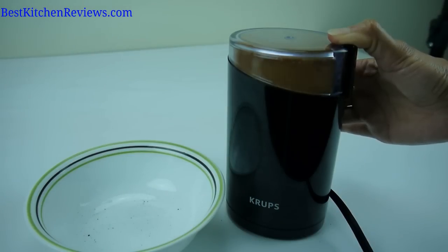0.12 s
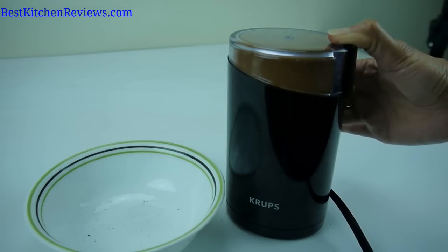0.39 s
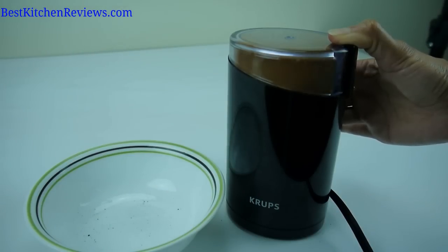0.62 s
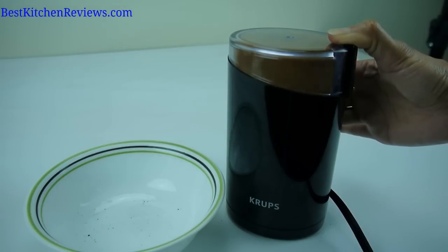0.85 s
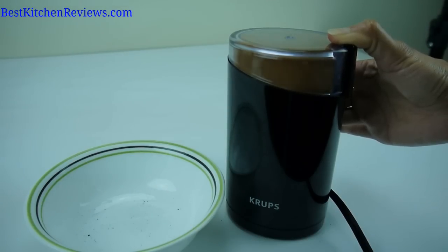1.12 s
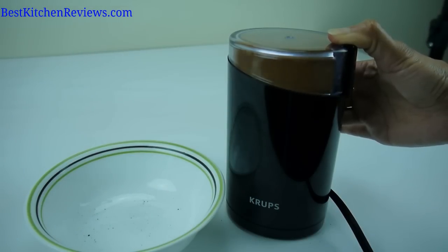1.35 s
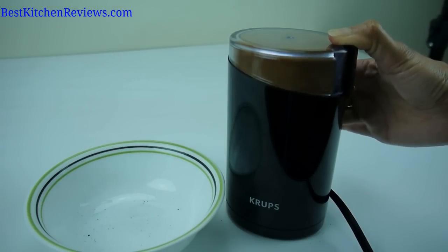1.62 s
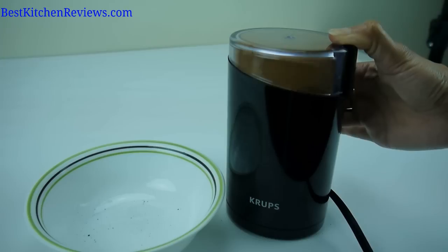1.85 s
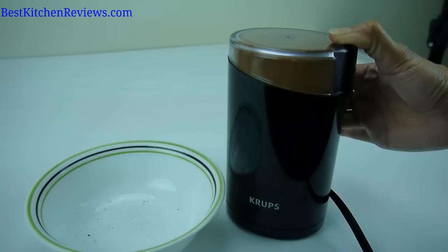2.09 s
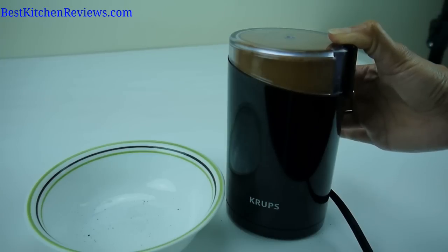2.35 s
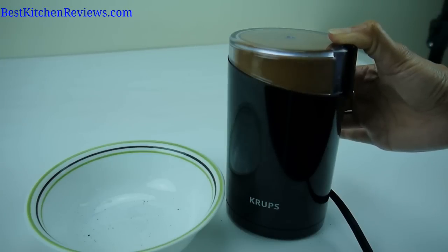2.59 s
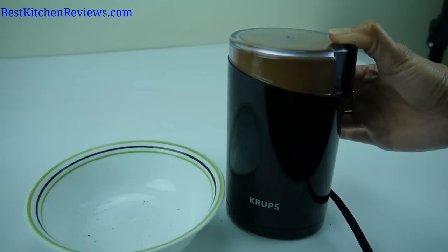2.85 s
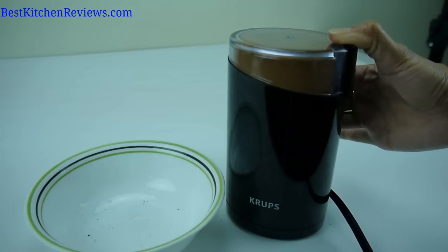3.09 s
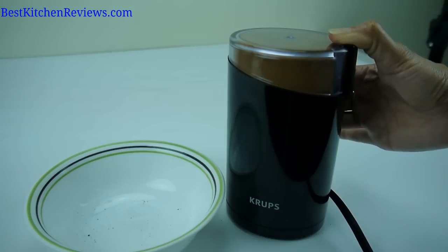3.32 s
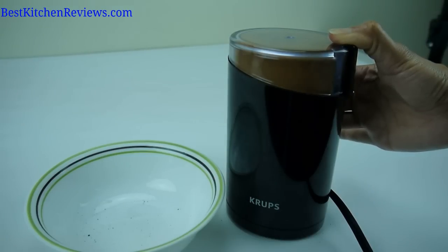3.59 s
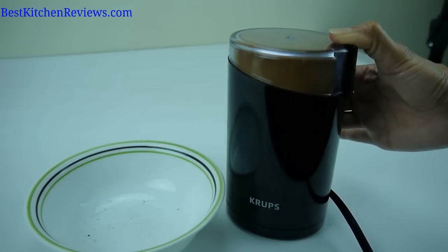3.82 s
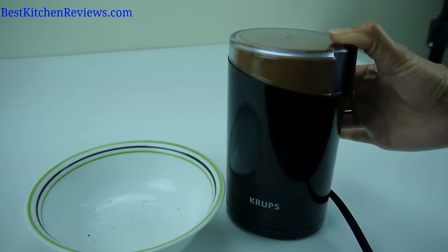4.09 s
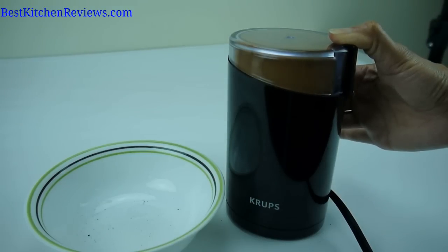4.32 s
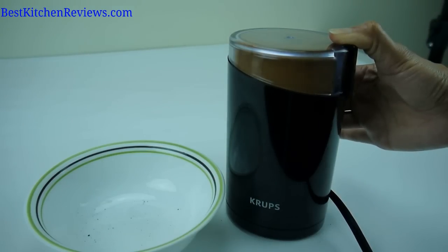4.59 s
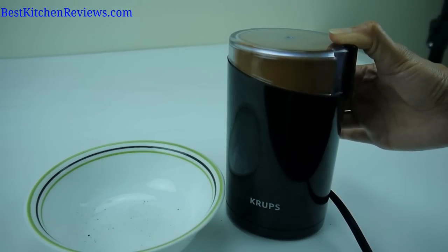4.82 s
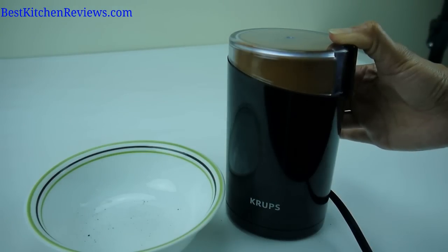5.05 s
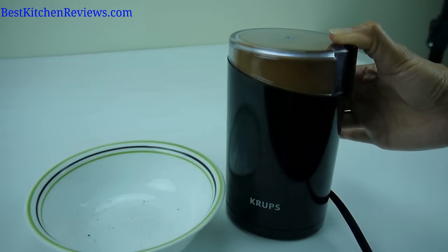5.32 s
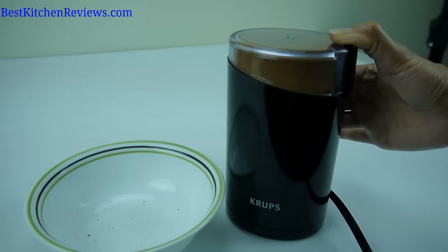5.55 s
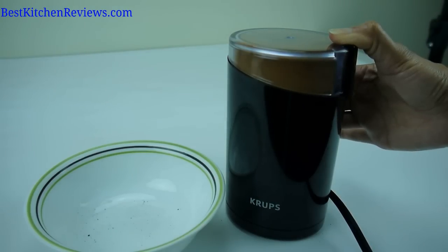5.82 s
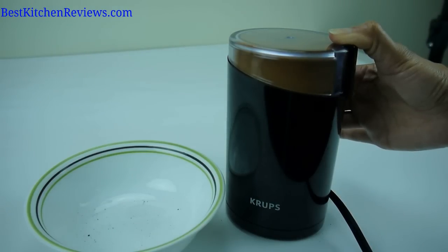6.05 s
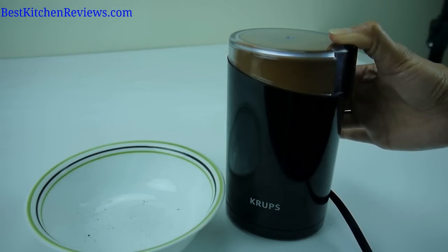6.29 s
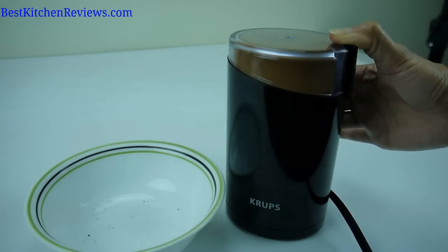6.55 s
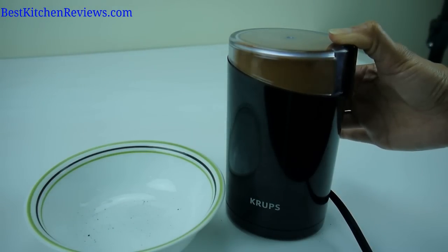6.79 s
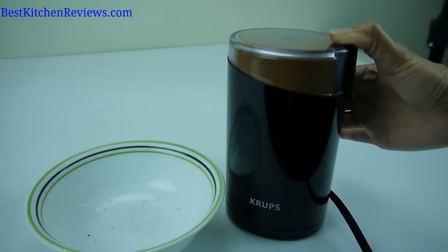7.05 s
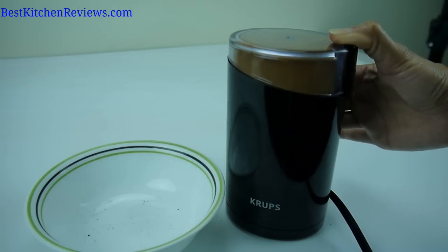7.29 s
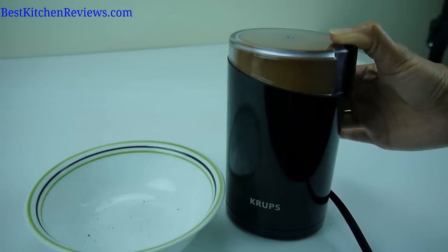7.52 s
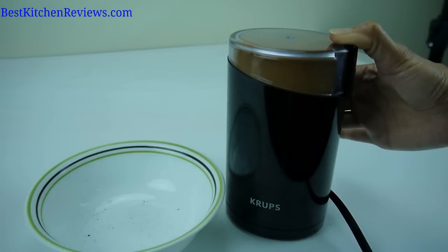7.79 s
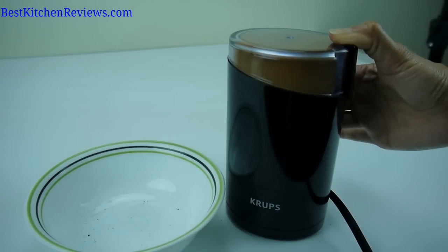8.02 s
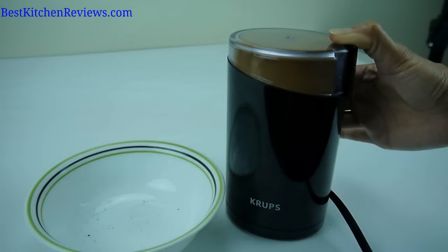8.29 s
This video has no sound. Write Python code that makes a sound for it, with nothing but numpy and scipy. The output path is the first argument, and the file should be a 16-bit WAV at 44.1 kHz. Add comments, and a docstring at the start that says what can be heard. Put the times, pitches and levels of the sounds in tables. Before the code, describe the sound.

From 0 s an electric blade grinder is already at full speed, loud and close in a small hard room. A piercing whine near 3.5 kHz swells within the first 0.3 s, wavering and dipping when heavy pieces hit, creeping slightly higher over time. Beneath are a faint low hum, an unsteady mid-pitched shaft tone and flickering low patches. Dense crumbs make a bright, gritty hiss throughout. Hard sticks strike the cup and plastic cover roughly twenty irregular main times a second, with lighter taps between: dry cracks, brief clatter, occasional dull thumps, the hardest overloading. From about 3 to 5.5 s the motor tones become steadier; the whine weakens near 5.7 s and returns around 6.3 s. Light cracks and hiss soften slightly, yet strong clatter bursts continue around 7 to 7.6 s. Short wall reflections surround everything. It ends near 8.4 s still running.

```python
"""In a small hard room, an electric blade grinder runs at full speed on a table, close to a stereo microphone.
The motor is a set of wandering sines: a whine on the eighth shaft order, the shaft tone, mains hum and side tones.
Crumbs (dense random grains) and struck sticks (sharp decaying bursts) ring one cup and its plastic cover.
Narrow low patches, sines of wandering phase, blink on and off; hard strikes add noise thumps;
feedback delays add the walls, and the hardest bursts overload the recorder."""
import sys
import numpy as np
from scipy import signal
from scipy.fft import rfft, irfft
from scipy.io import wavfile
from scipy.ndimage import uniform_filter1d

SR = 44100
rng = np.random.default_rng(int(sys.argv[2]) if len(sys.argv) > 2 else 0)


def boost(x):
    """Linear amplitude factor 10**(x/20) for a level x in decibels (scalar or array-like)."""
    u = np.asarray(x, float) / 20
    return 10 ** u


def to_wav(s):
    """Save 16-bit WAV."""
    ch = np.atleast_2d(s).T  # columns
    pcm = np.round(np.clip(ch, -1, 1) * 32767)  # PCM
    wavfile.write(sys.argv[1], SR, pcm.astype(np.int16))


N = 370440

# hard blows of the blade on a stick, levels relative:
# start_s [s], crack_db [dB], clatter_db [dB], knock_db [dB, dull knock above the rattle]
BLOWS = [(0.004, 5.5, -5, -17), (0.073, 0, -20.0, -13.0), (0.0827, -11.5, -2, -16),
         (0.1147, -20.0, -4, -19.0), (0.182, -14, -4, -11.0), (0.214, -16, 4.5, -23),
         (0.237, -13, -22, -15.0), (0.2677, -20.0, 4.5, -7), (0.3844, 3, -13, -10.0),
         (0.431, -24, -4, -16.0), (0.4869, -5.5, -18, -21.0), (0.5108, -4, -13.0, -11.0),
         (0.5358, -20.0, -2, -17), (0.561, -20.0, 7.5, 1.5), (0.6577, -16, 4.5, -15),
         (0.7046, -7, 0, -12.5), (0.713, 0.0, -20.0, -11.0), (0.7273, -22, -6, -16.0),
         (0.749, -18, -5, -14), (0.758, -10.5, -4.5, -10.0), (0.8171, -20.0, -3.5, -18),
         (0.854, 7, -20.5, -13), (0.878, -9.0, 5, -12), (0.89, -20.0, -4, -15), (0.918, 2, -4, -8),
         (0.939, 1, -20.0, -8), (1.0267, -5.0, 0.5, -9), (1.0487, 0.5, -12.5, -15), (1.0544, 10, 2, -13.5),
         (1.097, -18, -1, -4), (1.1504, -5, -13.5, -10.0), (1.1796, 2.5, -20.0, -14),
         (1.2342, -17, -5.5, -24.0), (1.283, -3, 2, -16.5), (1.291, -20.0, 3.5, -12), (1.3768, -8, -1, -17),
         (1.404, 7, 2, -7), (1.4407, -16, -1.5, -16), (1.5, -22, 11, -25), (1.5915, -1.0, 0.5, -16),
         (1.6362, -14, -7, -14.0), (1.6476, 2, -16, -16), (1.6824, -8, -3.5, -9), (1.7679, -10, -3.5, -19),
         (1.776, 7, -16, -24), (1.7856, -10.5, -5, -18), (1.7959, -9.5, -28, -14.0),
         (1.832, -7.5, -4, -25.5), (1.888, -4, 0, -2.5), (1.9156, -4, -18, -15.0),
         (1.9727, -20.0, -2, -15.5), (1.984, -9.5, 3.5, -23.5), (2.0124, -23, 1.5, -25),
         (2.062, -5, -20.0, -13), (2.1012, -22, -1, -18), (2.1301, -20.0, 0.5, -13.0),
         (2.1501, 4, -11, -14.0), (2.168, -11, -6.5, -14), (2.186, -1, -17, -14.0),
         (2.2379, -5.5, -13, -10), (2.2668, -6, -3.5, -10), (2.3336, -0.5, -19, -17.5),
         (2.3791, 8, -2.5, -5.5), (2.413, -20.0, -5, -4), (2.4383, 2.5, -25, -13.0), (2.5065, 2.5, -8, -19),
         (2.5362, -17, 2.5, -5), (2.62, -16.5, 1.5, -14.5), (2.6833, 2, -3, -16.5), (2.719, -2, -23, -14),
         (2.7556, -17, -2.5, -4.5), (2.7666, -2.5, -13, -10.0), (2.7896, -13.5, -4, -15),
         (2.8247, -10, 3.5, -0.5), (2.869, 1, -13.0, -14), (2.897, -21.5, -3, -8.0),
         (2.977, -1, -10.5, -18.0), (3.0915, 0, 1.0, -20), (3.122, -0.5, -22, -8.5),
         (3.1294, -1.5, -10, -17), (3.2395, 6, -17, -16), (3.2475, -20.0, -4.5, -15.5),
         (3.2557, -20.0, -5, -16.5), (3.316, -11.5, -1.5, -9.5), (3.378, -21.5, -5, -16),
         (3.405, -1, -4, -17.5), (3.4231, -20.5, -5, -19), (3.4521, -20.0, -2.5, -15.0),
         (3.5205, -21.5, 2.5, -10), (3.5365, -21, 8, -3), (3.61, -5.0, 3.5, -10), (3.67, -6, -3.5, -17.5),
         (3.7234, -23, 0, -25.5), (3.822, -20.0, -3, -16), (3.928, 0, -2.5, -3), (3.9866, -9, 7, -11),
         (4.0344, 5, 0.5, -18), (4.0776, -22.5, -1.5, -18), (4.1575, -22, -3.5, -9.5),
         (4.2642, 0.5, -12.5, -7.5), (4.2832, -0.5, -13, -3), (4.3005, -1.0, 2.5, -6),
         (4.3135, 0, 1.5, -10), (4.338, 0, -8.5, -17), (4.4142, 2, -21, -11.0), (4.4734, -1, -15.5, -14.5),
         (4.4957, -20.0, -5, -19.5), (4.6294, -11, 5, -17), (4.683, -6, -3.5, -11.5),
         (4.8767, -3, 0.5, -18), (4.9347, -0.5, -15, -15.0), (4.9462, 2, -10, -15.5),
         (4.9576, -3.0, -19, -17.0), (5.0172, 0.5, -4, -3), (5.0286, -22.5, 4.5, -13.0),
         (5.086, -24, -3.5, -12), (5.153, -2, -10.5, -5), (5.1751, -2, -9, -16.5), (5.213, -22.5, -7, 1),
         (5.2459, -10.5, -5, -13.0), (5.275, 0, -9.5, -11.5), (5.3367, -2.0, -32, -13.0),
         (5.3816, -9.5, -13, -18.5), (5.4195, -3, -5.5, -2.5), (5.4385, -3, -9, -14),
         (5.487, -26, -5.5, -5), (5.5755, -16.5, -2.5, -0.5), (5.627, -28, -3, -13.5),
         (5.654, 0, 0.5, -18.5), (5.755, -20.0, -4, -15.5), (5.768, -24, -5, -13),
         (5.9613, -27, -0.5, -17.5), (6.09, -6.0, -9, -7.5), (6.139, 1.5, -15.0, -8.5),
         (6.1608, -15.0, -8, -6), (6.1788, -20.0, -2, -12), (6.3733, -24, -3, -8.0),
         (6.3943, 4, -24.5, -15), (6.441, -21.5, -6, -23.5), (6.5499, -3, 1, -0.5), (6.5616, -17.5, 5, -2),
         (6.6233, -19, -4, -3), (6.707, 1.5, -21, -9), (6.7654, -14.0, -13, -13.5),
         (6.8463, -20.5, -10, -7.5), (6.8916, 3, -6.5, -16), (6.9301, -18, -5.5, -14),
         (6.94, 4.5, -9.5, -15), (6.966, 2, 5, -13.0), (7.029, -14.5, 6.5, -3.5), (7.0528, 2, -19, -6),
         (7.0763, -19.5, -5, 1.5), (7.229, -16.5, -6, -13.0), (7.277, -20.0, 1.5, -10.5),
         (7.3581, -19.5, 9, -7), (7.414, -17, -4.5, -12.5), (7.4918, -12.5, -7, -10.5),
         (7.5122, -21, 8.5, -6.5), (7.557, -20.0, 6.5, -5.5), (7.6194, -19, -3, -15.5),
         (7.835, -12, -9, -1), (7.8879, -11.5, -8.5, -20), (7.9637, -20.5, -4.5, -7),
         (8.0452, -5.5, -4.5, -10.5), (8.144, -13, -1.0, -5), (8.1812, -4.5, -11.5, -10.5),
         (8.192, -0.5, -26, -12.5), (8.2844, -10.0, -6, -19), (8.3498, -20.5, -2, -18),
         (8.3717, 1, -7, -21)]
# how far the low sounds sway between the sides: pitch_hz [Hz], side_minus_mid_db [dB]
SIDE_SWAY = [(60, -15.5), (380, -10), (2380, 0), (15000, -14)]
SIDES = np.array([[1], [-1]])   # left, right


def rms_one(x):
    """Scale to unit rms."""
    return x / np.sqrt(np.mean(x ** 2) + 1e-20)


def in_time(rows):
    """Columns of a time curve, read sample by sample."""
    s, *columns = np.transpose(rows)
    return [np.interp(np.arange(N) / SR, s, column) for column in columns]


def at_hz(points, hz):
    """Read a spectrum on a log-frequency axis."""
    points_hz, points_db = np.transpose(points)
    return np.interp(np.log(hz), np.log(points_hz), points_db)


def drift(rate):
    """Smooth random wander around rms 1: noise low-passed at rate (Hz)."""
    sos = signal.butter(4, rate, fs=SR / 40, output="sos")
    slow = signal.sosfilt(sos, rng.standard_normal(N // 40 + 2002))[2000:]   # skip the filter's start-up
    return np.interp(np.arange(N) / 40, np.arange(len(slow)), rms_one(slow))


def blink(rate, depth_db):
    """A gain that mostly stays up and now and then drops far."""
    return boost(-depth_db * np.maximum(drift(rate), 0) ** 2)


def grains(per_s, spread_db):
    """Random contacts of uneven size and either sign; rms 1."""
    sizes = boost(spread_db * np.minimum(rng.exponential(1, N), 5)) * rng.choice([-1, 1], N)
    return rms_one(sizes * (rng.random(N) < per_s / SR))


def settling(at_s):
    """Glide from 0 (shaft running rough under big pieces) to 1 (running evenly)."""
    return .5 + .5 * np.tanh((np.arange(N) / SR - at_s) / .05)


def braking():
    """Shaft speed lost to blows with loud clatter (turns per s), growing with it, then caught up."""
    sag_per_db, from_db, recovery_s = 1.6, 2.5, .05
    s, _, clatter_db, _ = np.transpose(BLOWS)
    blows = np.zeros(N)
    blows[np.minimum(s * SR, N - 1).astype(int)] = sag_per_db * np.maximum(clatter_db - from_db, 0)
    lost = signal.lfilter([1], [1, -np.exp(-1 / (recovery_s * SR))], blows)
    return uniform_filter1d(lost, size=600, origin=299)   # the loss builds over 600 samples


def motor():
    """Slot whine on the eighth shaft order; below it shaft tone, side tones and hum, whose levels dip at times."""
    # speed of the shaft before braking: time_s [s], speed [turns per s]
    shaft_speed = [(0, 427), (.5, 430), (.8, 428.2), (1.35, 435), (2.1, 432.4), (2.6, 434.3), (3.2, 440.2),
                   (3.55, 436.5), (3.8, 438.4), (4.35, 436.6), (4.85, 442.8), (5.2, 440.4), (5.5, 442.5),
                   (6.1, 444.5), (6.6, 444.5), (6.9, 441.4), (7.6, 441.5), (8.05, 444.3), (8.4, 443.2)]
    # slot whine before its dips: time_s [s], level_db [dB]
    whine_curve = [(0, -36), (.3, -26.5), (1.2, -26), (2.2, -27), (2.9, -29.5), (4.3, -29), (4.8, -32),
                   (5.7, -35), (6.3, -26), (6.7, -29.5), (7.3, -32.5), (8.1, -29), (8.4, -32)]
    # shaft tone before its dips: time_s [s], level_db [dB]
    shaft_curve = [(0, -38), (.8, -47), (1.7, -37.5), (2.5, -41), (3.4, -37.5), (4.6, -46), (5.6, -44),
                   (6.9, -42.5), (7.1, -35), (7.85, -34), (8.05, -51), (8.4, -49.5)]
    # pitch of the side tones: shaft_order [multiples of shaft speed], throbs_added [multiples of the throb]
    side_orders = [(1, 1), (1, 2), (2, -1), (2, 0), (2, 1)]
    # level of the side tones before dips: rough_db [dB], even_db [dB], settles_at_s [s]
    side_levels = [(-53, -43, 4.95), (-50.5, -46, 4.3), (-54.5, -46, 2.9), (-48, -41.5, 5.6),
                   (-73, -41.5, 4.62)]
    throb_hz, throb_db = 119.9, -41.5   # magnetic pull at twice the mains frequency

    turns, = in_time(shaft_speed)
    whine_db, = in_time(whine_curve)
    shaft_db, = in_time(shaft_curve)
    shaft = 2 * np.pi * np.cumsum((turns - braking()) * (1 + 0.0016 * drift(35.0))) / SR
    throb = 2 * np.pi * throb_hz * np.arange(N) / SR

    whine_level = boost(whine_db + 1.5 * drift(4.0)) * blink(16.0, depth_db=6.5)
    whine = whine_level * np.sin(8 * shaft + .3 * drift(30.0))

    hum_level = boost(throb_db) * blink(19.3, depth_db=7.5)
    tones = [(throb_hz, hum_level, throb + 0.59 * drift(22.6))]

    even = settling(2.9)
    loose = np.clip((-32 - shaft_db) / 6, .15, 1)   # once even, the shaft tone steadies as it swells
    dip_db = 23.5 - even * (23.5 - 8.0 * loose)
    wander = 2.2 - even * (2.2 - .45 * loose)   # radians
    shaft_level = boost(shaft_db) * blink(7.6, depth_db=dip_db)
    tones.append((440, shaft_level, shaft + wander * drift(11.7)))

    for (order, throbs), (rough_db, even_db, settles_at_s) in zip(side_orders, side_levels):
        even = settling(settles_at_s)
        level = boost(rough_db + even * (even_db - rough_db)) * blink(10.9, depth_db=81.0 - 51.0 * even)
        phase = order * shaft + throbs * throb + (1.7 - 1.34 * even) * drift(8.8)
        tones.append((440 * order, level, phase))

    low = np.zeros((2, N))
    for near_hz, level, phase in tones:
        sway = boost(at_hz(SIDE_SWAY, near_hz)) * drift(12.4)   # table echoes shift each tone between the ears
        low += level * (np.sin(phase) + sway * np.sin(phase + np.pi / 4) * SIDES)
    return np.sqrt(2) * whine, np.sqrt(2) * low


def taps():
    """Rows like the blows, by chance: light cracks with little clatter, weaker as the sticks wear down."""
    per_s, loudest_db, spread_db, wear_db_per_s = 40, -9.5, 20.5, .5
    gap, size, dull = rng.random((int(per_s * N / SR), 3)).T
    s = (np.arange(len(gap)) + gap) / per_s
    crack_db = loudest_db - wear_db_per_s * s - spread_db * size
    return np.transpose([s, crack_db, crack_db - 14.5, -8 + 10.0 * (dull - .5)])


def strike_force():
    """Each strike cracks and leaves the pieces clattering; rows: knock, rattle, its bright edge."""
    crack_t60_s, clatter_t60_s, hold_s, rise_s = 0.038, 0.22, 0.00083, 0.0004
    out, rows = np.zeros((3, N)), [*BLOWS, *taps()]
    t = np.arange(int(.3 * SR)) / SR
    after = np.maximum(t - hold_s, 0)
    rise = 1 - np.exp(-t / rise_s)
    onset = 1 + .5 * np.exp(-t / 0.0023)   # the clatter starts a little stronger
    tilts_db = 3.5 * 2 * (rng.random(len(rows)) - .5)   # each lands elsewhere, brighter or darker
    for (s, crack_db, clatter_db, knock_db), tilt_db in zip(rows, tilts_db):
        at = int(s * SR)
        crack = boost(crack_db - 60 * after / crack_t60_s)
        clatter = boost(clatter_db - 60 * after / clatter_t60_s) * onset
        gains = boost(np.array([[knock_db], [-tilt_db], [tilt_db]]))
        out[:, at:at + len(t)] += (gains * rise * (crack + clatter))[:, :N - at]
    return out


def cup_response():
    """Causal ringing of the cup: broad colour plus cover resonances, as a minimum-phase response."""
    # broad colour of the rattle: pitch_hz [Hz], level_db [dB]
    cup_colour = [(1000, -64), (1400, -45), (1750, -8), (2700, -9), (3400, -9), (4200, -8.5), (5500, -7.5),
                  (7000, -5.5), (8200, -3), (9800, -9), (11500, -10.5), (12800, -17), (14000, -17),
                  (14600, -22.5)]
    # resonances of the plastic cover: pitch_hz [Hz]
    cover_pitches = [1850, 3320, 3810, 5080, 6330, 8120, 9350, 10420, 13410]
    # for each resonance: width_hz [Hz], level_db [dB]
    cover_peaks = [(270, -42), (60, -5), (78.6, -8.5), (99, -5), (150, -6.5), (390, -2.5), (395, -5.5),
                   (250, -6.5), (290, -4.5)]
    # dips where cup and cover cancel: pitch_hz [Hz], width_hz [Hz], level_db [dB]
    cancelling_dips = [(2620, 90, -5), (2840, 120, -10), (3170, 110, -8)]
    hz = np.maximum(np.fft.rfftfreq(4096, 1 / SR), 1)
    power = boost(2 * at_hz(cup_colour, hz))
    for pitch_hz, (width_hz, level_db) in zip(cover_pitches, cover_peaks):
        power += boost(2 * level_db) / (1 + (2 * (hz - pitch_hz) / width_hz) ** 2) ** 2
    for pitch_hz, width_hz, level_db in cancelling_dips:
        power *= boost(2 * level_db / (1 + (2 * (hz - pitch_hz) / width_hz) ** 2))
    # fold the cepstrum onto positive time: minimum phase
    cepstrum = irfft(np.log(power) / 2)
    cepstrum[1:2048] *= 2
    cepstrum[2049:] = 0
    return irfft(np.exp(rfft(cepstrum)))[:2048]


def rattle():
    """Crumbs, chips and sticks all strike the same cup; returns its sound and the smoothed knock force."""
    hiss_db = -12.5 - 0.18 * np.arange(N) / SR   # crumbs sound softer as they get finer
    knock, clatter, edge = strike_force()

    chatter = grains(per_s=16000, spread_db=2.0)
    dull = signal.sosfilt(signal.butter(1, 3500, fs=SR, output="sos"), chatter)
    sharp = signal.sosfilt(signal.butter(2, 7500, "high", fs=SR, output="sos"), chatter)
    middle = chatter - dull - sharp
    sticks = knock * dull + clatter * middle + edge * sharp

    # small chips flung at the cover swell the hiss, each decaying with a 4 ms time constant
    chips = signal.lfilter([1], [1, -np.exp(-1 / (.004 * SR))], np.abs(grains(per_s=70, spread_db=3.0)))
    swirl = boost(hiss_db + 0.89 * drift(21.8)) * (1 + 0.041 * chips)   # the load tumbles unevenly
    crumbs = swirl * grains(per_s=9000, spread_db=1.0)

    push = boost(3.0) * crumbs + boost(-1.5) * sticks
    return signal.fftconvolve(push, cup_response())[:N], uniform_filter1d(knock, size=600, origin=299)


def low_patches():
    """Narrow low patches blink on and off: sines of wandering phase, each silent more often than not."""
    # colour of the patches, levels relative: pitch_hz [Hz], level_db [dB]
    patch_colour = [(170, -30), (250, -36), (330, -13), (470, 9), (600, -17.5), (750, 4), (1000, -11),
                    (1180, -12), (1330, -8.5), (1600, 1)]
    out, t = np.zeros((2, N)), np.arange(N) / SR
    groups = [blink(7.6, depth_db=44.0) for _ in range(6)]   # up to five neighbours share their dips
    for k, hz in enumerate(np.arange(300, 1650, 47.0)):
        lit = np.clip(drift(9.23) - .5, 0, .6) ** 2 * groups[k // 5]
        level = boost(at_hz(patch_colour, hz) - 25.0 - 0.57 * t)   # the patches slowly fade
        wander = 1.37 * drift(11.9) + 11.56 * drift(1.513)   # radians
        patch = level * lit * np.sin(2 * np.pi * hz * t + wander)
        out += patch * (1 + boost(at_hz(SIDE_SWAY, hz)) * drift(6.7) * SIDES)
    return out


def thumps(knocks):
    """Only the hardest strikes thump through the case, as low noise; the table top shudders all along."""
    thump = signal.sosfilt(signal.butter(2, 2700, fs=SR, output="sos"), rng.standard_normal((2, N)))
    thump = thump[0] + boost(-11) * thump[1] * SIDES
    # the shudder lies below the hum
    table = signal.sosfilt(signal.butter(6, 100.0, fs=SR, output="sos"), thump)
    return boost(-15.5) * thump * np.maximum(knocks - .45, 0) + boost(-33.0) * table


def room(x):
    """Wall reflections: six feedback delays a side, duller on every round."""
    t60_s, wall_cut_hz = 0.056, 16000
    out, dull = np.zeros((2, N)), np.exp(-2 * np.pi * wall_cut_hz / SR)
    for k, lag in enumerate((rng.uniform(0.01, 0.044, 12) * SR).astype(int)):
        loop, gain, state = x.copy(), boost(-60 * lag / SR / t60_s), [0.]
        for i in range(lag, N, lag):
            back, state = signal.lfilter([gain * (1 - dull)], [1, -dull], loop[i - lag:i], zi=state)
            loop[i:i + lag] += back[:N - i]
        out[k % 2] += (loop - x) * (-1) ** (k // 2)
    return out


def limiter(x, ceiling_db, release_db_per_s):
    """Gain drops almost at once under a peak and climbs back steadily."""
    climb = release_db_per_s * np.arange(N) / SR
    level_db = 20 * np.log10(np.abs(x).max(axis=0) + 1e-6)
    held_db = np.maximum.accumulate(level_db + climb) - climb
    return x * boost(-uniform_filter1d(np.maximum(held_db - ceiling_db, 0), size=40))


def scene():
    """The grinder, heard direct, off the table and by way of the walls, over the low patches."""
    clatter, knocks = rattle()
    whine, low_tones = motor()
    bright = clatter + whine
    # the table echo, 0.7 ms late, reaches the two sides with opposite sign
    echo = boost(-19) * np.roll(bright, int(.0007 * SR)) * SIDES
    low = low_tones + low_patches() + thumps(knocks)
    low = low * boost(.5 * SIDES)   # the low sounds lean left
    return bright + echo + boost(-2) * room(bright) + low


def low_pass(x):
    """Removes everything above the highest recorded frequency."""
    return signal.sosfilt(signal.butter(12, 15570, fs=SR, output="sos"), x)


def record(dry):
    """A fast limiter holds the strikes down, the input saturates, the top is cut, peaks still hit the ceiling."""
    held = limiter(dry, ceiling_db=4.5, release_db_per_s=1190)
    saturated = held / (1 + (held / 1.05) ** 16) ** (1 / 16)
    cut = signal.sosfilt(signal.ellip(10, .5, 48, 14480, fs=SR, output="sos"), saturated)
    mix = np.clip(cut + .0095, -1, 1)   # the converter rests slightly above zero
    return low_pass(mix)


dry = scene()
out = record(dry)
to_wav(out)
```